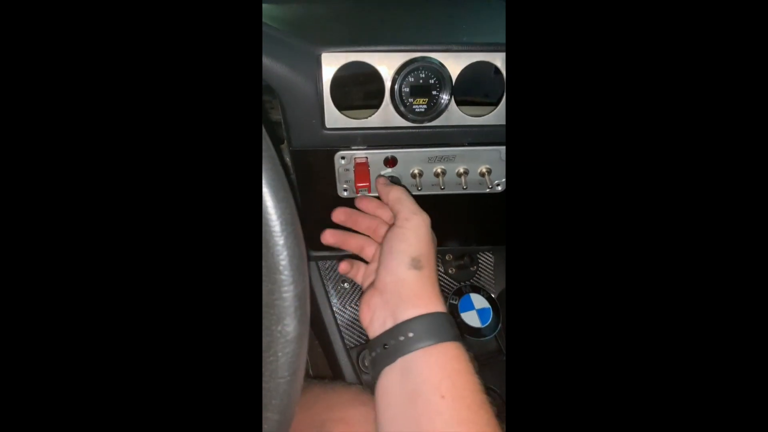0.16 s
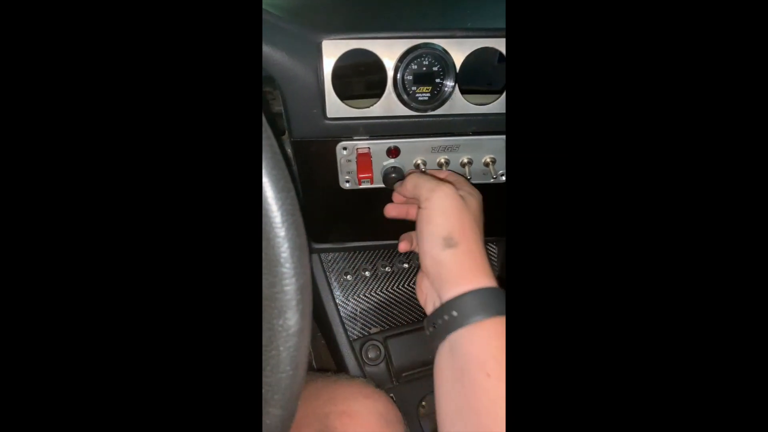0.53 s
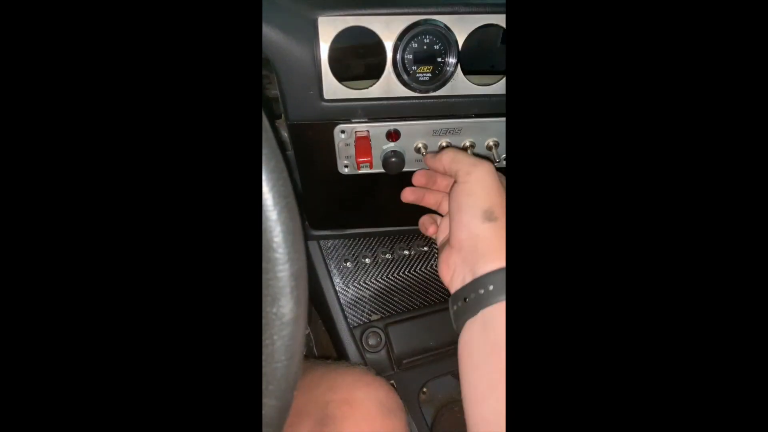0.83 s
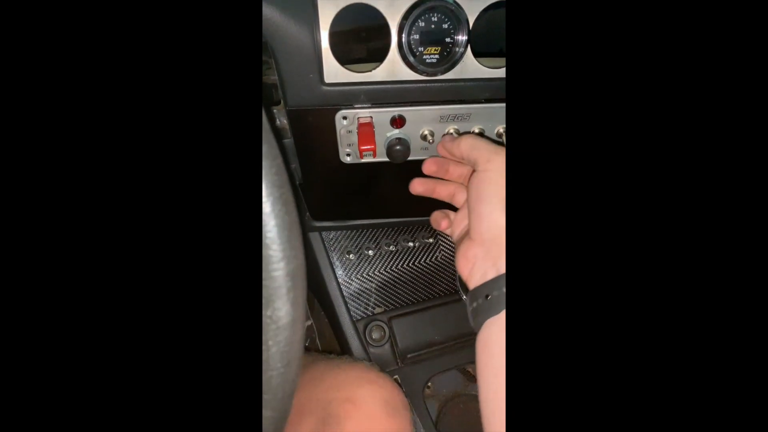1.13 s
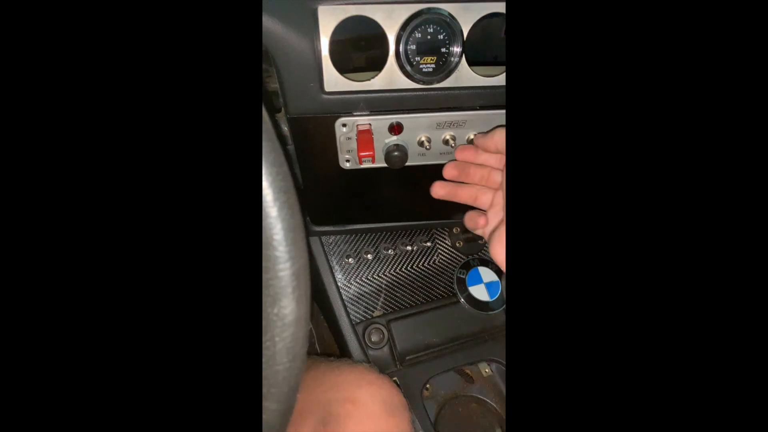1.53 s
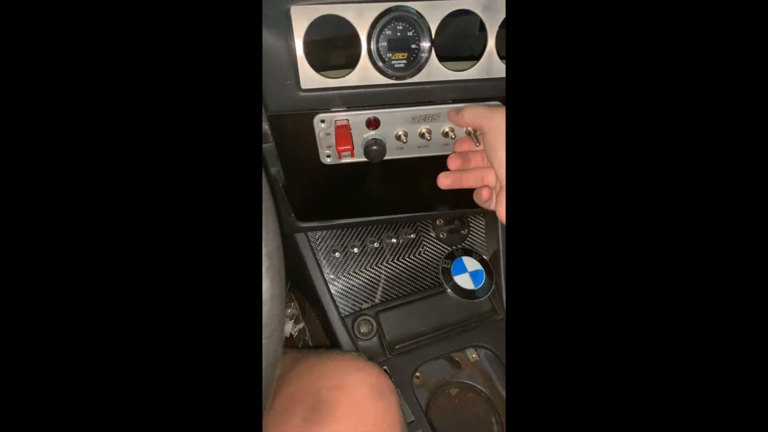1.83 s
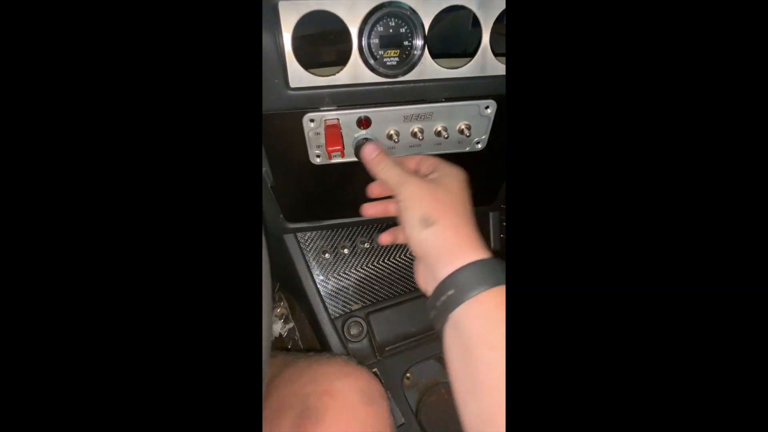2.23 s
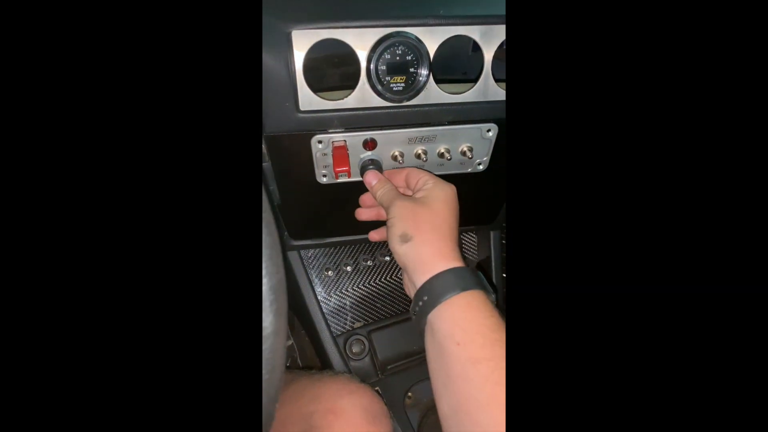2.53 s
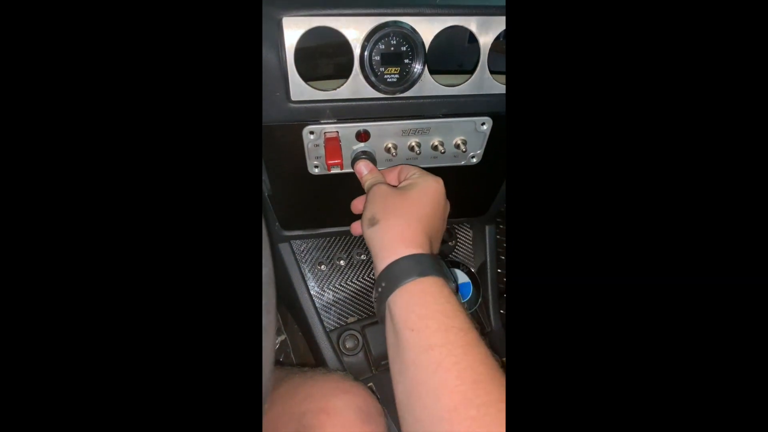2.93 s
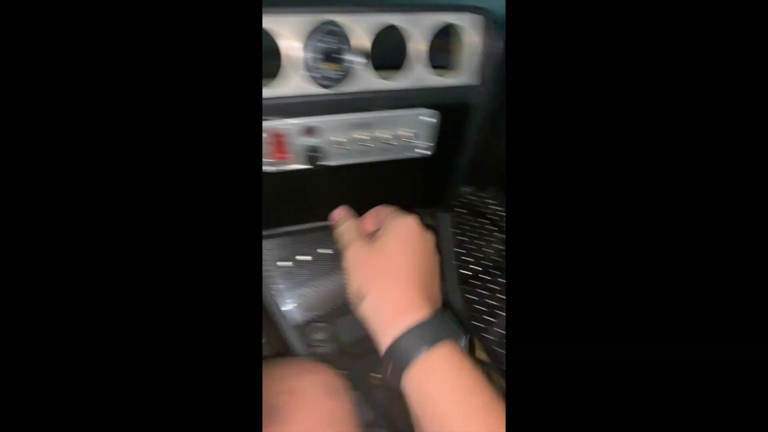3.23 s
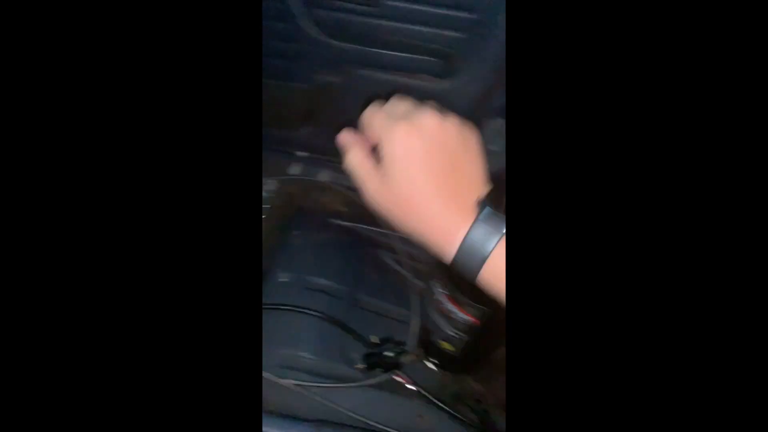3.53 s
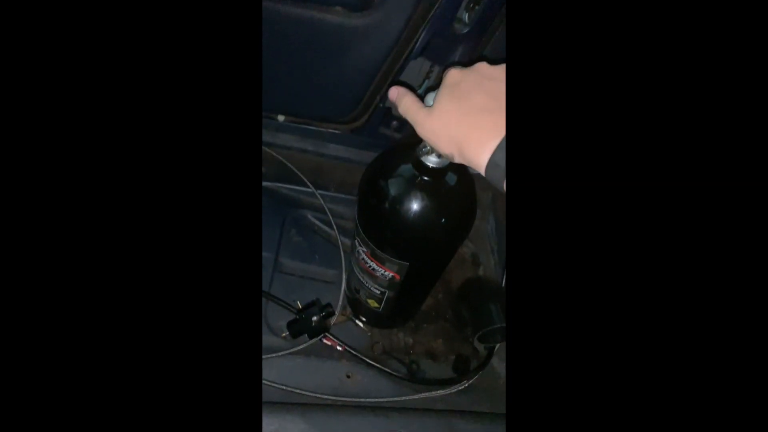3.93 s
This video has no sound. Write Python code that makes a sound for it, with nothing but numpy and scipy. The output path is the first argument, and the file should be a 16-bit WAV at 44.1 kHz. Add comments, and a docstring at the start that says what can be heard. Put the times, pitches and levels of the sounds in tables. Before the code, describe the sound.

Five toggle switches snap over one by one inside a car, followed by finger knocks and a short gritty knob rattle.

```python
"""Five toggle switches snap over one by one in the first two seconds; panel rings, dash thuds, cabin answers.
Contacts are filtered noise bursts, bodies are decaying sine modes, reflections are decaying noise.
Among and after the toggles fingers, levers and a knob knock on the panel, with dull bumps beneath.
From 2.8 s the knob sticks and slips in three strokes; the arm swishes faintly at 1.3 s and from 3 s on.
Low rumble, handling noise and faint hiss, all coloured noise, run throughout; two phone ports hear it."""
import sys
import numpy as np
from scipy import signal
from scipy.fft import rfft, irfft, next_fast_len
from scipy.io import wavfile

SR = 44100
rng = np.random.default_rng(int(sys.argv[2]) if len(sys.argv) > 2 else 0)


def wav_out(sig):
    """Save sig, one row per channel (or a flat mono array), as 16-bit PCM at SR to the path in sys.argv[1]."""
    wavfile.write(sys.argv[1], SR, np.round(np.clip(np.atleast_2d(sig).T, -1, 1) * 32767).astype(np.int16))


N = 179571
SIZE = 16384  # samples per event
T = np.arange(SIZE) / SR
HZ = np.fft.rfftfreq(SIZE, 1 / SR)

# Levels are relative; each layer adds a fixed gain.
# toggle flicks: start_s, snap_db, seat_db (re snap), lever_db, lever_hz, clack_db, clack_fall_db_per_octave,
# panel_hz, thud_db, thud_hz
TOGGLE_FLICKS = [(0.0495, -13, 0.5, -27.5, 6980, -10, 1, 734, -23.5, 166.8),
                 (0.5853, -16, 7, -18.5, 3350, -11.5, -0.5, 700, -32.5, 242),
                 (1.0330, -15, 3.5, -28.5, 7600, -13, 0.5, 1500, -29.5, 380),
                 (1.4621, -14, -0.5, -17.5, 8000, -10, 14, 950, -27.5, 286),
                 (1.95, -17.5, 4.5, -14.5, 11000, -18, 2, 880, -30.5, 159)]
# knocks of fingers, levers, knob: start_s, level_db, hardness (0 skin - 1 metal), centre_hz,
# ring_db (panel, re knock), ring_hz
PANEL_KNOCKS = [(0.082, -19.5, 0.79, 1438, 0, 1490), (0.843, -44, 0.28, 1000, 4, 800),
                (1.494, -11, 0.63, 1500, 1, 1910), (1.601, -15, 0.25, 1373, -4, 1500),
                (1.802, -34, 0.62, 1152, -1, 723), (1.942, -22.5, 0.73, 1480, 4, 880),
                (1.965, -16.5, 0.99, 1120, 2, 2180), (1.982, -11, 0.8, 1560, -6.5, 1710),
                (2.055, -17, 0.43, 1300, 0.5, 885), (2.109, -17, 0.58, 1530, -3, 890),
                (2.252, -36.5, 0.39, 1060, 0, 760), (2.286, -23, 0.24, 787, 0, 738),
                (2.655, -21.5, 0.23, 1130, -0.5, 1700), (2.689, -12, 0.65, 1700, -1, 1710),
                (2.768, -35.5, 0.34, 1160, -2, 780), (2.809, -22, .25, 850, 3, 715),
                (2.831, -16, 0.9, 1150, -13, 660), (3.038, -28.5, 0.064, 1170, 0, 925),
                (3.185, -28.5, 0.69, 1380, -10, 2080), (3.212, -20.5, 0.77, 1660, -24.5, 1750),
                (3.303, -30.5, .22, 810, 4.5, 725), (3.475, -40, 0.35, 862, 3, 790),
                (3.609, -28.5, .08, 1108, -12, 1100), (3.748, -36, 0.34, 740, -2.5, 656),
                (3.929, -32, 0.072, 1100, -8.5, 1075)]
# knob strokes, each a run of slips: start_s, length_s, level_db, hardness (0-1), thud_db (re slip), thud_hz
KNOB_STROKES = [(2.804, 0.038, -21, 0.68, -11, 194), (2.902, .048, -22.5, 0.64, -12.5, 185),
                (3.1, .07, -38.5, 0.48, -7, 151)]
# bumps of the hand on dash and floor: start_s, level_db, centre_hz
HAND_BUMPS = [(0.844, -41, 95.3), (1.964, -33, 148), (2.284, -36, 109.2), (2.805, -28, 306),
              (3.192, -31.5, 370), (3.213, -25.5, 126), (3.61, -41.5, 450), (3.745, -30, 81.4),
              (3.749, -38, 380), (3.928, -42.5, 451)]
# swishes of the moving arm: peak_s, level_db, rise_s, fall_s (time per SWISH_DEPTH_DB)
ARM_SWISHES = [(1.3, -64, .07, 0.19), (3.156, -47, 0.052, 0.027), (3.45, -54, 0.16, 0.24),
               (3.95, -76, .4, 0.86)]
# low rumble over time: time_s, level_db
RUMBLE_LEVEL = [(0.0, -43.5), (0.1, -51), (0.59, -56.5), (0.62, -44), (0.82, -55), (0.86, -39.5),
                (0.97, -55.5), (1.12, -41), (1.37, -56), (1.52, -40.5), (1.72, -50), (2.02, -43.5),
                (2.31, -54.5), (2.84, -46.5), (2.88, -34.5), (2.91, -44.5), (3.29, -35), (3.39, -50.5),
                (3.88, -37.5), (3.91, -44.5), (4.07, -47.5)]
# handling noise over time: time_s, level_db
HANDLING_LEVEL = [(0.0, -54.5), (0.33, -60), (0.89, -59), (0.99, -51), (1.31, -59), (2.13, -51),
                  (2.31, -59), (2.53, -61.5), (2.71, -56.5), (2.83, -66), (3.13, -43.5), (3.34, -57.5),
                  (3.51, -54.5), (4.07, -55)]

# steel lever modes: mode_hz, level_db, t60_s
LEVER_MODES = [(3350, -3, .06), (6065, -2, .08), (6240, -3, .08), (6770, -1, .08), (7220, 0, .08),
               (8060, -2, .08), (10965, -2, .07), (12170, -1, .07), (14550, -3, .06), (15100, -3, .06)]
# switch panel modes: mode_hz, level_db, t60_s (before damping by the hand)
PANEL_MODES = [(716, 1, .19), (872, -1, .16), (1166, -1, .13), (1344, -2, .13), (1712, -1, .12),
               (1846, -3, .12), (2081, -1, .11), (2207, -6, .11)]
# trim modes: mode_hz, level_db, t60_s
TRIM_MODES = [(107.7, -7, 0.086), (164.5, -3, 0.24), (239, -1, 0.1), (333.3, -2, 0.084),
              (488.5, -4.5, 0.082)]
# cabin decay: band_hz, t60_s
CABIN_DECAY = [(100, 0.48), (400, 0.16), (1500, 0.11), (6000, 0.13), (15000, 0.071)]

# colour of metal snap and tick: band_hz, level_db
SNAP_COLOUR = [(300, -11.5), (1500, -27.5), (2600, -20), (3400, -3), (4500, -4), (5900, -1.5), (7200, -0.5),
               (8000, -1.5), (8700, 1.5), (10500, -1.5), (12200, 1.5), (13700, -1.5), (14800, 5.5),
               (16500, -13.5)]
# colour of the clack: band_hz, level_db
CLACK_COLOUR = [(100, -22), (520, -8), (750, 0), (1200, -5), (2100, -4), (2700, -10), (4000, -5.5),
                (6000, -14.5), (16000, -39.5)]
# colour of the push on the dash: band_hz, level_db
DASH_COLOUR = [(40, -10), (110, 0), (200, -2), (350, 2.5), (700, -9), (2000, -38)]
# colour of the rumble: band_hz, level_db
RUMBLE_COLOUR = [(15, -13), (38, 5), (60, -5.5), (100, -10.5), (200, -31), (600, -74)]
# colour of the handling noise: band_hz, level_db
HANDLING_COLOUR = [(40, -22.5), (100, -5.5), (165, 2.5), (330, -5.5), (520, -11), (900, -15.5), (1400, -23),
                   (2200, -36.5), (4000, -54.5), (8000, -71)]
# colour of the arm's rustle: band_hz, level_db
RUSTLE_COLOUR = [(300, -2), (1200, -12.5), (3200, -5.5), (5000, -8), (7000, -12), (11000, -18.5),
                 (16000, -25)]
# colour of the hiss: band_hz, level_db
HISS_COLOUR = [(1000, 2), (2000, -14), (3000, -9), (4500, -14.5), (5600, -19.5), (6300, -6.5), (6800, 5.5),
               (7500, -10.5), (9000, -18.5), (16000, -20)]
# phase by which the left port leads the right: band_hz, lead_rad
PORT_LEAD = [(0, 0), (1400, -.3), (2300, .5), (4750, 3.14), (9050, 9.42), (13250, 15.7), (16400, 19.5)]

CRACK_T60_S, SEAT_T60_S = .003, .009
SEAT_S, CLACK_LAG_S, THUD_LAG_S = .0019, .003, .006  # after the snap
FLICK_TICK_DB, FLICK_RING_DB = -11.5, 1  # metal tick and panel ring, re clack
SOFT_FALL_DB_PER_OCTAVE, HARD_FALL_DB_PER_OCTAVE = 17.5, 3.5  # clack: skin, metal
SOFT_TICK_DB, HARD_TICK_DB = -51, 0  # tick re knock: skin, metal
KNOCK_THUD_DB, KNOCK_THUD_HZ = -26, 300  # level re knock
FLICK_RING_RISE_S, KNOCK_RING_RISE_S = .008, .0006
FLICK_DAMPING_DB_PER_S, KNOCK_DAMPING_DB_PER_S = 260.5, 50.5  # extra panel loss under the hand
CLACK_LEAD_S = .016  # the clack starts swelling this early
SLIP_HZ, SLIP_JITTER, SLIP_SCATTER_DB = 1240, .25, 5  # colour, share of the gap, level spread
SLIP_RING_DB, SLIP_RING_HZ, SLIP_RING_OCTAVES = 2.5, 930, 1  # level re slip, centre, spread
SWISH_DEPTH_DB = 20
PORT_CEILING, TOP_HZ = .85, 15900


def amp(db):
    """Decibels to gain."""
    return 10 ** (np.asarray(db) / 20)


def unit(x):
    """x at energy 1."""
    return x / np.sqrt(np.sum(x ** 2) + 1e-20)


def along(points, hz):
    """(Hz, value) points read on a log frequency axis."""
    f, v = np.transpose(points)
    return np.interp(np.log(hz + 1), np.log(f), v)


def curve(points):
    """(s, value) points read at every sample."""
    return np.interp(np.arange(N) / SR, *np.transpose(points))


def add(track, s, parts):
    """Mix an event's (delay s, sound) parts into the track at time s."""
    for delay_s, sound in parts:
        start = round((s + delay_s) * SR)
        track[:, start:start + SIZE] += sound[..., :N - start]


def filtered(x, response):
    """x times a response of frequency."""
    m = next_fast_len(N + SIZE)
    spectrum = rfft(x, m) * response(np.fft.rfftfreq(m, 1 / SR))
    return irfft(spectrum, m)[..., :N]


def coloured(x, colour_db):
    """A short sound through a causal minimum-phase filter, at energy 1."""
    cepstrum = irfft(np.log(amp(colour_db)))
    fold = 1 + np.sign(SIZE // 2 - np.arange(SIZE)) * (np.arange(SIZE) > 0)
    return unit(irfft(rfft(x) * np.exp(rfft(cepstrum * fold))))


def tilt_db(centre_hz, slope_db):
    """Gain in dB that falls per octave away from a centre."""
    return -slope_db * np.abs(np.log2((HZ + 10) / centre_hz))


def burst(t60_s, delay_s=0, rise_s=.001):
    """Chatter of one contact: noise that swells by 60 dB to its peak at the delay, then dies."""
    fall_db = 60 * np.maximum((T - delay_s) / t60_s, (delay_s - T) / rise_s)
    return unit(rng.standard_normal(SIZE) * amp(-fall_db))


def ring(modes, centre_hz, slope_db, attack_s, damping_db_per_s=0, scatter_db=0.96):
    """Decaying modes of a struck body; where it is struck decides which ring most."""
    hz, db, t60_s = np.transpose(modes)[:, :, None]
    mode_db = db - slope_db * np.abs(np.log2(hz / centre_hz))
    mode_db = mode_db + scatter_db * rng.standard_normal(hz.shape)
    phase = 2 * np.pi * rng.random(hz.shape)
    fall_db = (60 / t60_s + damping_db_per_s) * T
    waves = amp(mode_db - fall_db) * np.sin(2 * np.pi * hz * T + phase)
    return unit(np.sum(waves, axis=0) * (1 - np.exp(-T / attack_s)))


def cabin(x, wet_db, apart_db=-17, build_s=0.0048):
    """A sound plus dense short reflections: one tail common to both ports, one of each port's own."""
    noise = rng.standard_normal((3, SIZE))
    hz, t, bands = signal.stft(noise, SR, nperseg=256)
    decay = amp(-60 * t / along(CABIN_DECAY, hz)[:, None])
    tails = signal.istft(bands * decay, SR, nperseg=256)[1][:, :SIZE]
    tails = tails * (1 - np.exp(-T / build_s))
    wet = signal.fftconvolve(x[None], tails, axes=1)[:, :SIZE]
    return x + amp(wet_db) * (unit(wet[0]) + amp(apart_db) * unit(wet[1:]))


def blow(db, centre_hz, slope_db, tick_db):
    """One blow on the panel: a clack cushioned by the finger and a tick of metal."""
    contact = burst(t60_s=0.013, delay_s=CLACK_LEAD_S + 0.00088, rise_s=0.022)
    clack = coloured(contact, along(CLACK_COLOUR, HZ) + tilt_db(centre_hz, slope_db))
    metal = burst(t60_s=0.012, delay_s=0.00082)
    tick = coloured(metal, along(SNAP_COLOUR, HZ) + tilt_db(5000, slope_db=6.5))
    return [(-CLACK_LEAD_S, amp(db + 12.5) * cabin(clack, wet_db=-3, apart_db=0)),
            (0, amp(db + tick_db + 21.5) * cabin(tick, wet_db=-1.0, apart_db=-14.5))]


def panel(db, centre_hz, rise_s, damping_db_per_s):
    """Ring that a blow leaves in the switch panel, damped by the hand."""
    sound = ring(PANEL_MODES, centre_hz, 13.5, rise_s, damping_db_per_s)
    return [(0, amp(db + 8) * sound)]


def thud(db, centre_hz):
    """The push of the hand shakes the trim, and the cabin booms."""
    push = coloured(burst(t60_s=0.0086), along(DASH_COLOUR, HZ) + tilt_db(centre_hz, slope_db=5.5))
    trim = ring(TRIM_MODES, centre_hz, slope_db=12.0, attack_s=0.0029)
    boom = cabin(push, wet_db=4.0, apart_db=-11.0)
    return [(0.00045, amp(db + 19.5) * boom + amp(db + 23.5) * trim)]


def knock(db, hardness, centre_hz, ring_db, ring_hz):
    """A blow and its ring; a harder contact has a broader colour and a stronger tick."""
    slope_db = SOFT_FALL_DB_PER_OCTAVE + hardness * (HARD_FALL_DB_PER_OCTAVE - SOFT_FALL_DB_PER_OCTAVE)
    tick_db = SOFT_TICK_DB + hardness * (HARD_TICK_DB - SOFT_TICK_DB)
    struck = blow(db, centre_hz, slope_db, tick_db)
    return struck + panel(db + ring_db, ring_hz, KNOCK_RING_RISE_S, KNOCK_DAMPING_DB_PER_S)


def snap(snap_db, seat_db, lever_db, lever_hz):
    """A spring throws the lever over; it cracks, strikes its seat and pings."""
    blows = burst(CRACK_T60_S) + amp(seat_db) * burst(SEAT_T60_S, delay_s=SEAT_S)
    lever_colour_db = np.maximum(tilt_db(lever_hz, slope_db=12.5), -6)
    crack = np.hypot(1, amp(seat_db)) * coloured(blows, along(SNAP_COLOUR, HZ) + lever_colour_db)
    ping = ring(LEVER_MODES, lever_hz, slope_db=2.5, attack_s=0.00087)
    heard = cabin(crack, wet_db=2, apart_db=-23.5)
    return [(0, amp(snap_db + 20) * heard + amp(lever_db + 18.5) * ping)]


def toggles():
    """Each lever snaps over and seats, then the panel clacks and rings and the dash thuds."""
    track = np.zeros((2, N))
    for (s, snap_db, seat_db, lever_db, lever_hz, clack_db, fall_db,
         panel_hz, thud_db, thud_hz) in TOGGLE_FLICKS:
        add(track, s, snap(snap_db, seat_db, lever_db, lever_hz))
        clack = blow(clack_db, centre_hz=1200, slope_db=fall_db, tick_db=FLICK_TICK_DB)
        ringing = panel(clack_db + FLICK_RING_DB, panel_hz, FLICK_RING_RISE_S, FLICK_DAMPING_DB_PER_S)
        add(track, s + CLACK_LAG_S, clack + ringing)
        add(track, s + THUD_LAG_S, thud(thud_db, thud_hz))
    return track


def knocks():
    """Fingers, levers and knob knock on the panel; each knock also nudges the dash."""
    track = np.zeros((2, N))
    for s, db, hardness, centre_hz, ring_db, ring_hz in PANEL_KNOCKS:
        add(track, s, knock(db, hardness, centre_hz, ring_db, ring_hz))
        add(track, s, thud(db + KNOCK_THUD_DB, KNOCK_THUD_HZ))
    return track


def knob(count=5):
    """Uneven stick-slip: every slip rattles the panel at a random pitch and shakes the dash."""
    track = np.zeros((2, N))
    for s, length_s, db, hardness, thud_db, thud_hz in KNOB_STROKES:
        gap_s = length_s / (count - 1)
        for k, (late, loud, high) in enumerate(rng.standard_normal((count, 3))):
            jitter = SLIP_JITTER * late * (k > 0)  # the first slip is on time
            when_s = s + gap_s * (k + jitter)
            slip_db = db + SLIP_SCATTER_DB * loud
            ring_hz = SLIP_RING_HZ * 2 ** (SLIP_RING_OCTAVES * high)
            add(track, when_s, knock(slip_db, hardness, SLIP_HZ, SLIP_RING_DB, ring_hz))
            add(track, when_s, thud(slip_db + thud_db, thud_hz))
    return track


def bumps():
    """Soft bumps of the hand that only thud."""
    track = np.zeros((2, N))
    for s, db, centre_hz in HAND_BUMPS:
        add(track, s, thud(db, centre_hz))
    return track


def rush(colour, apart_db):
    """Coloured stereo noise of rms 1: a common part plus each port's own at apart_db."""
    white = rng.standard_normal(N) + amp(apart_db) * rng.standard_normal((2, N))
    return unit(filtered(white, lambda hz: amp(along(colour, hz)))) * np.sqrt(2 * N)


def rustle():
    """The moving arm swishes: noise that swells and fades."""
    t = np.arange(N) / SR
    swell = np.zeros(N)
    for peak_s, db, rise_s, fall_s in ARM_SWISHES:
        away = np.maximum((peak_s - t) / rise_s, (t - peak_s) / fall_s)
        swell += amp(db - SWISH_DEPTH_DB * away)
    return swell * rush(RUSTLE_COLOUR, apart_db=-18.0)


def handling():
    """The hand rubs the phone: noise of wandering level, differing between the ports."""
    return amp(curve(HANDLING_LEVEL) - 2.8) * rush(HANDLING_COLOUR, apart_db=-5)


def rumble():
    """Low rumble of the hand-held phone: wandering noise, nearly alike at both ports."""
    return amp(curve(RUMBLE_LEVEL) + 1.64) * rush(RUMBLE_COLOUR, apart_db=-43)


def hiss():
    """Faint steady noise."""
    return amp(-71.0) * rush(HISS_COLOUR, apart_db=-12.5)


def scene():
    """Everything in the cabin, main source first."""
    hand = toggles() + knocks() + knob() + bumps()
    return hand + rustle() + handling() + rumble() + hiss()


def record(dry):
    """Two ports hear the treble out of step; peaks are rounded off and a steep low-pass ends the band."""
    def port_phase(hz):
        lead_rad = np.interp(hz, *np.transpose(PORT_LEAD))
        return np.exp(.5j * lead_rad * np.array([[1], [-1]]))

    ports = filtered(dry, port_phase)
    rounded = ports / (1 + np.abs(ports / PORT_CEILING) ** 4) ** (1 / 4)
    return filtered(rounded, lambda hz: 1 / np.sqrt(1 + (hz / TOP_HZ) ** 160))


dry = scene()
out = record(dry)
wav_out(out)
```